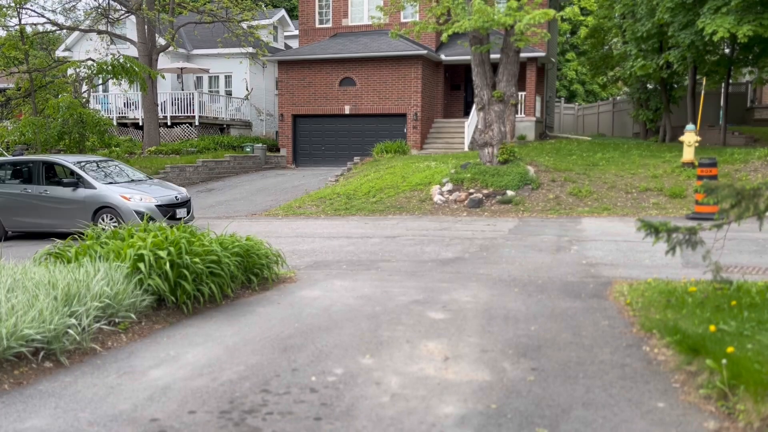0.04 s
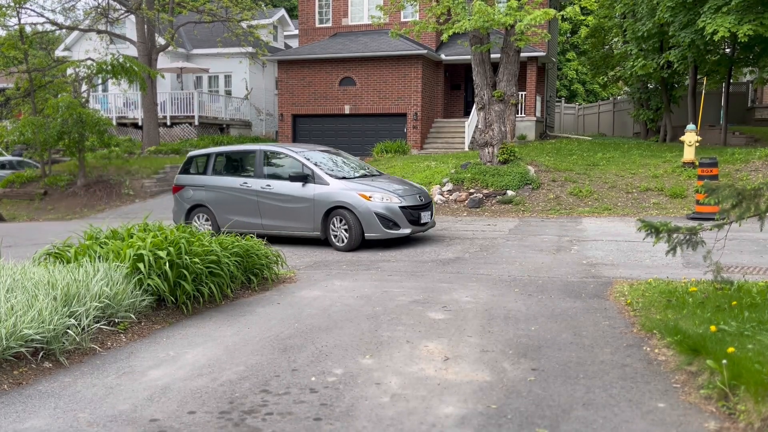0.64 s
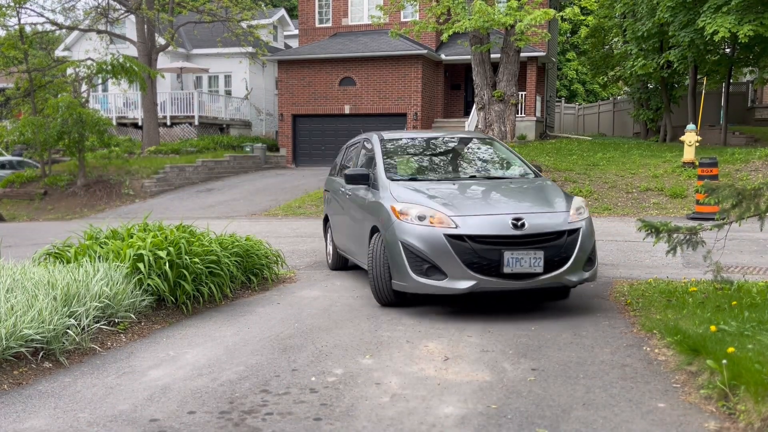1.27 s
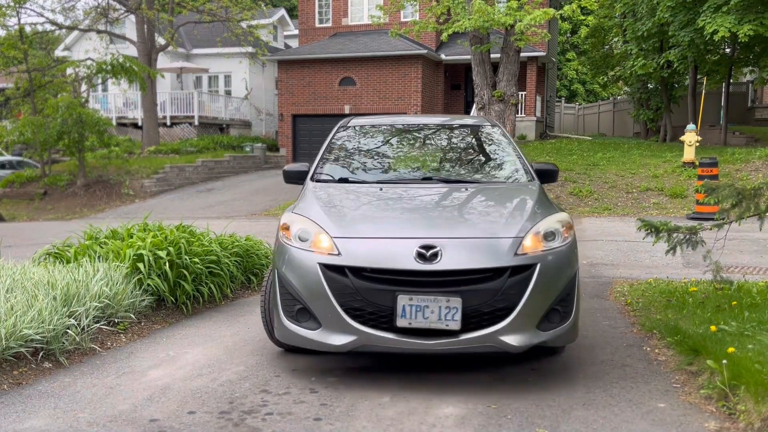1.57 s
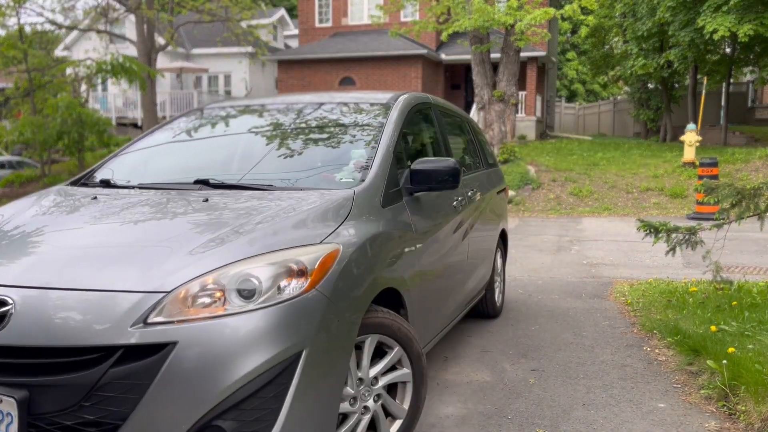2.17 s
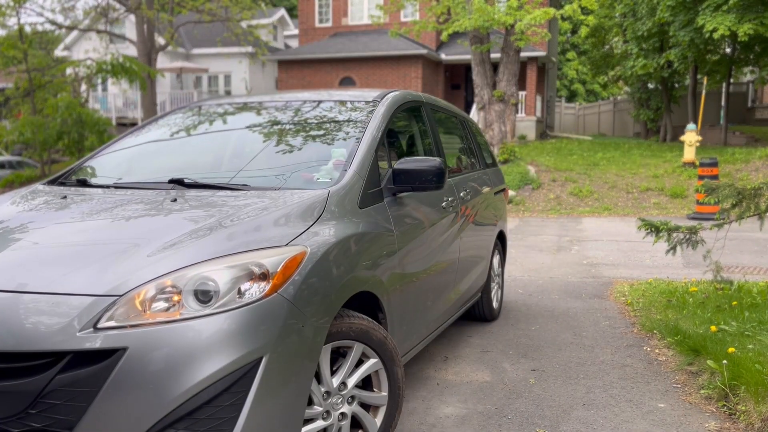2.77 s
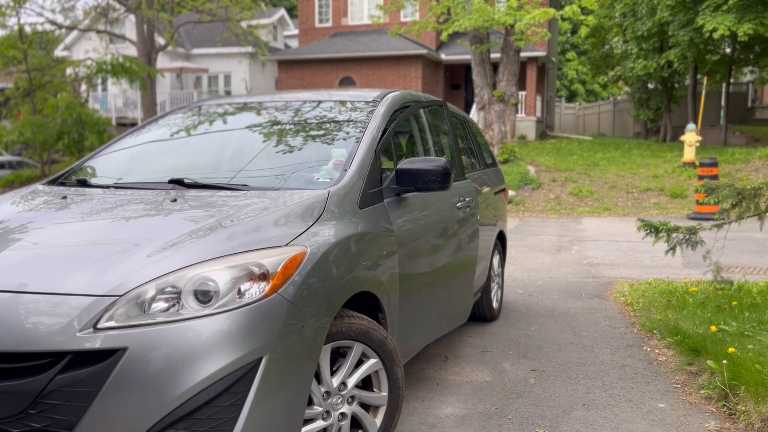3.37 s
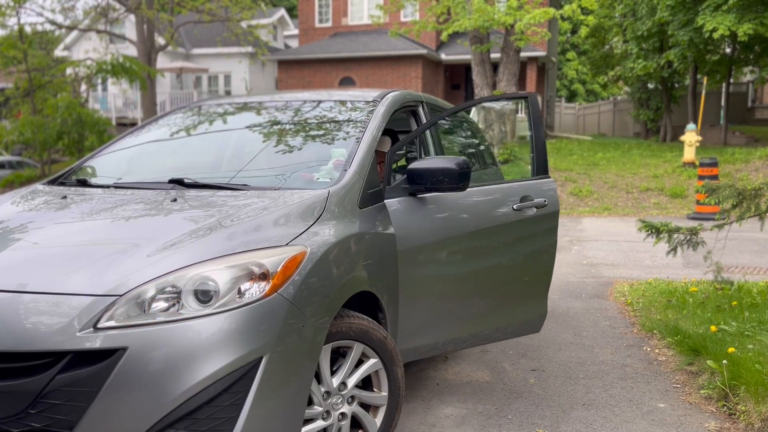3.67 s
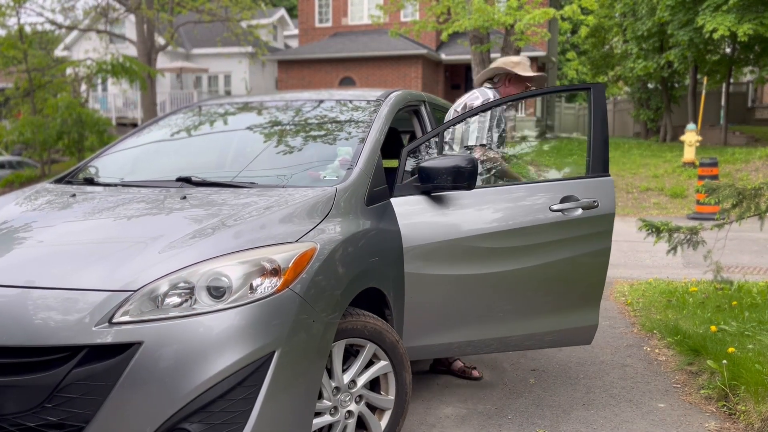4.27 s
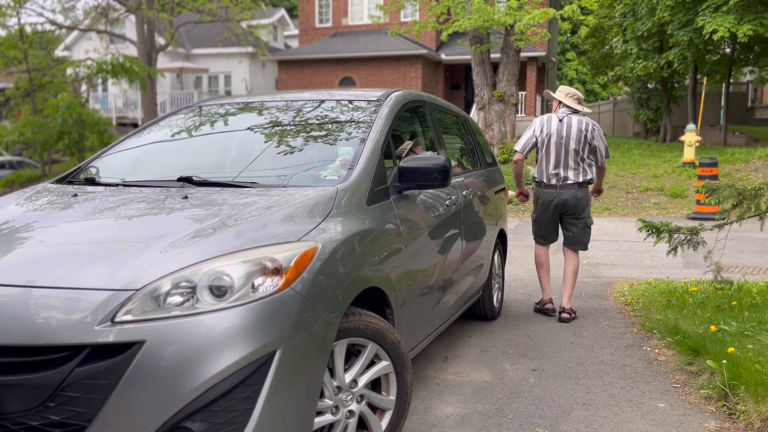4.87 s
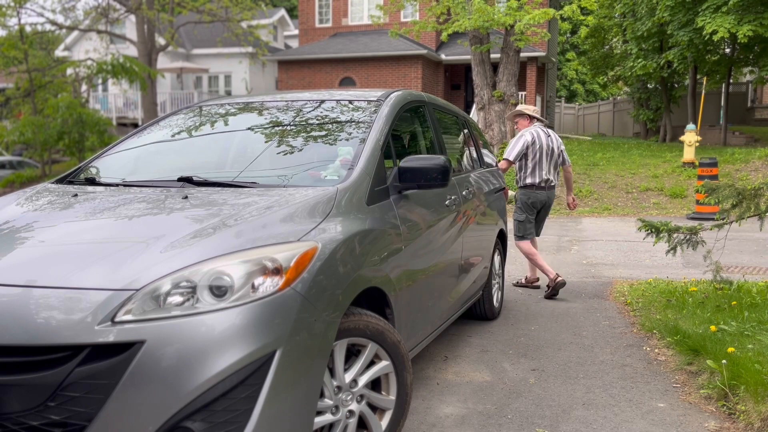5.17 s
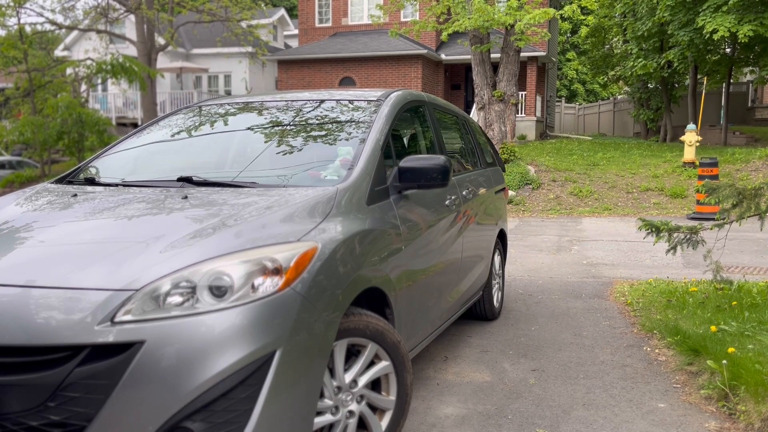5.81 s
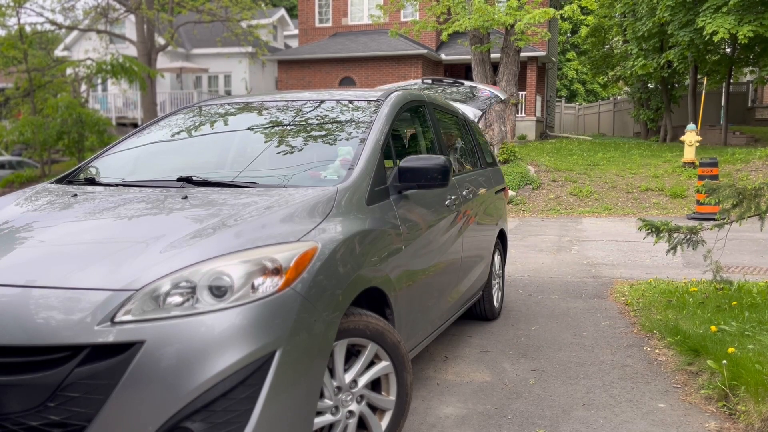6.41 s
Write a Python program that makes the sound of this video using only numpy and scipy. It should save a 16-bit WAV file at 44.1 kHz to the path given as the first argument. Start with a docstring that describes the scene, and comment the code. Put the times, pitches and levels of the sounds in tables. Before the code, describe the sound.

A small van's engine is running from the start, outdoors on a quiet street. It dips at about 0.4 seconds, revs briefly around 0.7, then settles to a low pulsing as it comes close, with a whirring fan and thin belt whine. Tyres scrub and crackle on the paving from about 0.5 to 2.5 seconds. At 2.9 the engine shuts off with a shudder and a few dull knocks. The door unlatches with two clacks around 3.3 seconds. The driver slides off the seat with a muffled rustle near 3.9, and keys clink between 4 and 4.4. At 4.8 the door slams close by, a loud thump with a short rattle and a slight echo off the houses. A small click follows, then the tailgate latch clunks softly at 5.7. Faint distant traffic and leaves continue underneath until the end, at about 6.5 seconds.

```python
"""A small van parks in a driveway

The van swings in over the paving, engine pulsing and fan whirring, stops close by and is switched off.
The driver opens the door, climbs out with clinking keys, slams it and unlatches the tailgate.
The houses echo it all, while distant traffic and leaves fill the quiet street."""
import sys
import numpy as np
from scipy import signal
from scipy.fft import rfft, irfft, next_fast_len
from scipy.io import wavfile
from scipy.ndimage import uniform_filter1d

SR = 44100
rng = np.random.default_rng(int(sys.argv[2]) if len(sys.argv) > 2 else 0)


def generate_wav(signal):
    """Clip the signal to [-1, 1] and save it as 16-bit WAV at the path in sys.argv[1]."""
    frames = np.transpose(np.atleast_2d(signal))
    scaled = np.clip(frames, -1, 1) * 32767
    pcm = np.round(scaled).astype(np.int16)
    wavfile.write(sys.argv[1], SR, pcm)


N = 293265
TIME = np.arange(N) / SR
KEY_OFF_S = 2.866


# How fast the engine fires until the key is turned: time_s, firings_per_s
ENGINE_SPEED = [(.03, 67.3), (.15, 63), (.2, 58.5), (.29, 45.5), (.37, 41), (.43, 46), (0.5, 67), (0.6, 94),
                (0.72, 106.5), (0.79, 101.5), (0.9, 81.7), (1.2, 69.5), (1.44, 72.1), (1.55, 75.9),
                (1.71, 66.2), (1.86, 70), (2.1, 65.2), (2.33, 69.8), (2.44, 67.7), (2.68, 60.5),
                (2.85, 70.2)]
def speed(run_down_s=0.11, walking_pace_hz=65):
    """The firing rate, dying away after key-off, and how many octaves it lies above walking pace."""
    rate = curves(ENGINE_SPEED)[0] * np.exp(-np.clip(TIME - KEY_OFF_S, 0, 1) / run_down_s)
    return rate, np.log2(rate / walking_pace_hz)


# Smooth when coasting, rough on the throttle: time_s, rough_share, blur_share, odd_harmonics_db
ENGINE_TEXTURE = [(.13, 0.15, 0.8, -10.5), (.35, 0.36, 1, -8), (.55, 0.28, 0.25, 0.5), (1.1, 0.27, 0.55, 1),
                  (1.55, 0.16, 0.39, 0)]
def firing(rate, lope=0.072, puff_turns=0.97, puff_hz=330, stumble_turns=0.052, harmonics=30):
    """Each firing is a pulse and a puff of gas. Blurring puts the harmonics out of step, into a hum."""
    rough, blur, odd_db = curves(ENGINE_TEXTURE)
    stumble = evened(band(rng.standard_normal(N), 28.7, "low"))
    turns = np.cumsum(rate) / SR + stumble_turns * rough * stumble  # one turn per firing
    odd = amp(odd_db)
    tone = sum((odd if k % 2 else 1) * np.cos(2 * np.pi * (k * turns + blur * lag))
               for k, lag in enumerate(rng.random(harmonics) - .5, 1))
    tone *= 1 + lope * (np.cos(np.pi * turns) + np.cos(np.pi * turns / 2))  # the cylinders are unequal
    puffs = np.exp(-(turns % 1) / puff_turns) * rng.standard_normal(N)
    puffs = signal.lfilter(*signal.butter(1, puff_hz, "high", fs=SR), band(puffs, 1600, "low"))
    running = TIME < KEY_OFF_S
    return (1 - rough) * tone / tone[running].std() + rough * puffs / puffs[running].std()


# The engine's three voices (coasting side-on, on the throttle, facing us): pitch_hz, level_db
COASTING = [(60, -34), (132, -1), (200, -13.5), (270, -4.5), (400, -10.5), (465, -7), (545, 1.5), (680, 3),
            (800, -1), (1400, -14), (2200, -58)]
PULLING = [(60, -34), (150, 3.5), (230, -1.5), (320, 6), (420, -9), (530, -0.5), (630, -3), (740, 0),
           (880, -18), (1300, -20), (2200, -43)]
NOSE_ON = [(60, -53.5), (135, -2.5), (205, 0.5), (272, 6.5), (340, -4.5), (420, -2), (560, -9), (680, -5.5),
           (770, -0.5), (1050, -25.5), (2200, -45)]
# Which voice we hear: time_s, voice (0 coasting, 1 pulling, 2 nose-on)
ENGINE_VOICE = [(.36, 0), (.5, 1), (.95, 1), (1.35, 2)]
# Exhaust and intake at walking pace, as the nose comes round: time_s, boom_db, growl_db
ENGINE_LEVELS = [(.1, -37.5, -43.5), (.31, -35.5, -41.5), (.4, -36.5, -46), (.52, -38, -42),
                 (.7, -39.5, -38.5), (1.2, -40.5, -55), (1.52, -34.5, -52.5), (2.3, -33.5, -42.5),
                 (2.8, -35.5, -47.5)]
# How strongly the air box rings in the turn: time_s, level_db
AIR_BOX_LEVEL = [(1.1, -25), (1.5, 5), (1.68, -5.5), (1.86, 6.5), (2.2, -22)]
# Its rising note: time_s, pitch_hz
AIR_BOX_PITCH = [(1.5, 478), (1.85, 525)]
def engine(rate, octaves, split_hz=450, db_per_octave=8, spreads_s=(.004, .003, .004)):
    """Four firing cylinders make the exhaust boom and the intake growl, louder with speed."""
    pulses = firing(rate)
    voice, = curves(ENGINE_VOICE)
    body = sum(np.maximum(1 - abs(voice - k), 0) * ring(dispersed(pulses, spreads_s[k]), colour)
               for k, colour in enumerate([COASTING, PULLING, NOSE_ON]))
    air_box = resonate(body, curves(AIR_BOX_PITCH)[0], width_hz=160)
    body = body + 2 * amp(curves(AIR_BOX_LEVEL)[0]) * air_box
    low = band(band(body, split_hz, "low")[::-1], split_hz, "low")[::-1]  # both ways, so no delay
    boom_db, growl_db = curves(ENGINE_LEVELS) + db_per_octave * octaves
    shudder = np.exp(-((TIME - 2.897) / 0.066) ** 2)  # the stalling engine shakes on its mounts
    boom = amp(boom_db + 8 * shudder) * steadied(low)
    growl = amp(growl_db + 7.5 * shudder) * steadied(body - low)
    return (boom + growl) * np.interp(TIME, [2.94, 3.02], [1, 0])


def dispersed(x, spread_s, top_hz=700):
    """A long path around the van smears each pulse: the treble arrives ahead of the bass."""
    length = next_fast_len(N + SR)
    hz = np.fft.rfftfreq(length, 1 / SR)
    lead_s = spread_s * np.minimum(hz / top_hz, 1)
    return irfft(rfft(x, length) * np.exp(2j * np.pi * np.cumsum(lead_s) * hz[1]), length)[:N]


# Belts and fan at walking pace, as the grille swings past: time_s, whirr_db, hiss_db
FAN_LEVELS = [(.4, -49.5, -62.5), (1.2, -52, -55.5), (1.9, -45.5, -49), (2.3, -44.5, -56),
              (2.85, -42, -57.5)]
# The tone of rushing air: pitch_hz, level_db
AIR_COLOUR = [(530, -1), (900, 1), (1210, -4.5), (1510, -3), (2050, -7), (5180, -17.5), (13400, -24),
              (15800, -29.5)]
# The fan's hiss ends up on the left: time_s, left_minus_right_db
HISS_PAN = [(.05, 7), (.6, 2), (1.4, 2), (2.74, 10.5)]
def whirr(rate, octaves, throb=0.089, split_hz=6500, db_per_octave=8):
    """Belts and fan rush louder with speed and throb with each firing."""
    whirr_db, hiss_db = curves(FAN_LEVELS) + db_per_octave * octaves
    rush = patchy(noise(AIR_COLOUR), depth_db=1.75, span_s=0.071, span_hz=200)
    rush = patchy(rush, depth_db=2.2, span_s=0.63, span_hz=129.2)  # the engine bay's ringing drifts
    rush *= 1 + throb * np.cos(2 * np.pi * np.cumsum(rate) / SR)
    low = amp(whirr_db) * evened(band(rush, split_hz, "low"))
    hiss = amp(hiss_db) * evened(band(rush, split_hz, "high"))
    return low + panned(hiss, curves(HISS_PAN)[0])


# Singing belts and pulleys: start_s, end_s, pitch_hz, width_hz, level_db
BELT_WHINES = [(.4, .98, 4980, 650, -55), (.6, 1.45, 4230, 260, -58.5), (2, 3.05, 5270, 280, -57.5)]
def whines():
    """Belts and pulleys sing airy notes that swell and fade."""
    air, out = noise(AIR_COLOUR), np.zeros((2, N))
    for start, end, hz, width_hz, db in BELT_WHINES:
        progress = np.clip((TIME - start) / (end - start), 0, 1)
        swell = np.sqrt(abs(np.sin(np.pi * progress)))
        out += amp(db) * swell * evened(resonate(air, hz, width_hz))
    return out


# How loud the tyres are: time_s, level_db
TYRE_LEVEL = [(.5, -54.5), (.93, -45), (1.3, -41), (1.65, -45), (1.9, -43), (2.5, -55), (2.8, -106)]
# The tone of rubber on paving: pitch_hz, level_db
TYRE_COLOUR = [(600, 1), (1200, 4), (2300, -2.5), (3300, 1.5), (6000, -4.5), (10000, -16), (16000, -59)]
def tyres(grains_per_s=260, spread_db=7, crack_db=-6, pan_db=-1):
    """The tyres scrub the paving in uneven patches and crack grains of sand."""
    sizes = amp(spread_db * np.minimum(rng.exponential(1, N), 2))
    grains = sizes * (rng.random(N) < grains_per_s / SR)
    crack = burst(TYRE_COLOUR, 0, fade_s=0.0044, tilt_db=5)
    cracks = signal.oaconvolve(grains[None], crack, axes=1)[:, :N]
    scrub = noise(TYRE_COLOUR) + amp(crack_db) * evened(cracks)
    scrub = patchy(scrub, depth_db=1.64, span_s=.04, span_hz=450)
    rolling = TIME < TYRE_LEVEL[-1][0]
    return panned(amp(curves(TYRE_LEVEL)[0]) * scrub * rolling, pan_db)


# The notes the door and its frame ring at: pitch_hz, level_db, fade_s
DOOR_NOTES = [(167.4, 5, 0.081), (207, -2, 0.17), (253, -1.5, 0.18), (336, -4.5, 0.12), (456, -7.5, 0.077),
              (522, -11, 0.12), (594, -13, 0.11), (680, -3, 0.065), (792, -15, 0.093), (1164, -8, 0.082),
              (1235, -12, .08), (1397, -12, .1), (1510, -12, 0.09), (1870, -12, 0.086), (1940, -4, 0.072),
              (2240, -7, .08)]
# The door meets the latch, then its seal: start_s, level_db, contact_s
DOOR_BLOWS = [(4.7807, -27, 0.00011), (4.7847, -13.5, 0.0046), (4.7918, -14, 0.00088)]
# Its sheet metal slaps as it stops: start_s, level_db, pitch_hz
DOOR_SLAPS = [(4.781, -13, 570), (4.791, -11.5, 437)]
# Latch and trim rattle: start_s, level_db, fade_s
DOOR_RATTLES = [(4.773, -30.5, 0.17), (4.7794, -13, 0.022), (4.781, -17, 0.046), (4.791, -23.5, 0.071),
                (4.812, -31, 0.037)]
# The tone of that rattle: pitch_hz, level_db
RATTLE_COLOUR = [(150, -6), (500, 10.5), (950, -6.5), (1400, 3), (2400, -6.5), (4000, -5.5), (5500, -10.5),
                 (9000, -11), (16000, -22)]
def slam(cycles_to_peak=.8):
    """The latch cracks, the door hits its seal and the panels boom while the trim rattles."""
    out, t = np.zeros((2, N)), TIME[:16000]
    panel = sum(amp(db) * np.sin(2 * np.pi * hz * t) * dying(t, fade_s) for hz, db, fade_s in DOOR_NOTES)
    for s, db, contact_s in DOOR_BLOWS:
        push = t * np.exp(-2 * np.pi * t / contact_s)  # a longer contact rings only the low notes
        add(out, s, amp(db) * signal.fftconvolve(panel, push / push.sum())[:len(t)])
    for s, db, hz in DOOR_SLAPS:
        age = t * hz / cycles_to_peak
        add(out, s, amp(db) * age * np.exp(1 - age) * np.sin(2 * np.pi * hz * t))
    for s, db, fade_s in DOOR_RATTLES:
        add(out, s, burst(RATTLE_COLOUR, db, fade_s))
    return out


# Dull knocks through the van's body: start_s, level_db, pitch_hz
BODY_KNOCKS = [(2.867, -9, 258.2), (2.886, -16.5, 209), (2.971, -18, 256), (3.0327, -8.5, 336),
               (3.051, -24, 171), (3.13, -28.5, 224), (3.758, -24.5, 216), (4.871, -21, 290)]
def knocks():
    """The van rocks to rest, levers are set and the door settles."""
    out = np.zeros((2, N))
    for s, db, hz in BODY_KNOCKS:
        add(out, s, thud(db, hz))
    return out


BODY_HZ, BODY_FADE_S = 194, 0.041
# The tone of the seat and trim: pitch_hz, level_db
TRIM_COLOUR = [(70, -39), (160, 14), (500, -8), (1000, -24), (4000, -43)]
def thud(db, hz, rise_s=0.0007, overtone_db=-11, rustle_db=-16):
    """One muffled thud in the van's body, with a rustle of trim."""
    t = TIME[:8000]
    fade_s = BODY_FADE_S * (BODY_HZ / hz) ** 2.65  # harder knocks ring higher and shorter
    overtone = amp(overtone_db) * np.sin(2 * np.pi * hz * 2.02 * t) * dying(t, 2 * fade_s)
    tone = (np.sin(2 * np.pi * hz * t) + overtone) * dying(t, fade_s)
    jolt = (burst(TRIM_COLOUR, rustle_db, fade_s) - tone) * (1 - np.exp(-t / rise_s))
    return amp(db) * band(band(jolt, 105, "high"), 700, "low")


# Lock, door and tailgate latches: start_s, click_db, thud_db, handle_lead_s
LATCHES = [(3.28, -44, -20.5, 0.002), (3.414, -34, -32, 0.0092), (5.66, -40.5, -24.5, 0.025)]
# The tones of latch and handle: pitch_hz, level_db
LATCH_COLOUR = [(200, -13), (700, 4), (1300, 3), (1750, 3), (2200, -0.5), (3000, -2), (4200, -7),
                (7200, -15.5), (15000, -26)]
HANDLE_COLOUR = [(1000, -16), (7300, -15), (8200, 6), (9200, -8), (15000, -18)]
def latches():
    """The handle ticks, then the latch springs with a clack and jolts the body."""
    out = np.zeros((2, N))
    for s, click_db, thud_db, lead_s in LATCHES:
        add(out, s - lead_s, burst(HANDLE_COLOUR, click_db - 14.5, fade_s=.02))
        add(out, s, burst(LATCH_COLOUR, click_db, fade_s=0.055) + thud(thud_db, BODY_HZ))
    return out


# The driver leans on the door, then slides off his seat: peak_s, level_db
SHUFFLES = [(3.355, -43), (3.878, -32.5)]
def shuffle(rise_s=0.035, fall_s=0.065, rub_s=3.905, rub_db=-47):
    """Seat and trim rumble as the driver shifts his weight, and cloth rubs over the seat's edge."""
    swell = sum(amp(db) * np.exp(np.minimum((TIME - s) / rise_s, (s - TIME) / fall_s))
                for s, db in SHUFFLES)
    cloth = evened(resonate(noise(AIR_COLOUR), hz=483, width_hz=230))
    rub = cloth * np.exp(-((TIME - rub_s) / rise_s) ** 2)
    return swell * noise(TRIM_COLOUR) + amp(rub_db) * rub


# Single small clicks: start_s, level_db, tilt_db_per_octave
CLICKS = [(.948, -35.5, -2), (1.833, -37, 11), (3.318, -48, 4.5), (3.707, -43.5, -0.5), (3.878, -43.5, -2),
          (3.943, -48, 0.5), (4.628, -39, -9), (5.218, -43.5, -1.5)]
# Their tone: pitch_hz, level_db
CLICK_COLOUR = [(150, -28), (450, 10.5), (900, 4), (2200, 2.5), (5000, 1.5), (10000, -11), (16000, -24)]
def clicks():
    """Small stones, levers and footsteps each give one short click."""
    out = np.zeros((2, N))
    for s, db, tilt_db in CLICKS:
        add(out, s, burst(CLICK_COLOUR, db, fade_s=0.05, tilt_db=tilt_db))
    return out


# Jolts to the bunch of keys: start_s, level_db, length_s, tilt_db_per_octave
KEY_JOLTS = [(3.955, -53, .005, -4), (3.999, -46.5, .005, 0), (4.133, -51, .005, -4),
             (4.3274, -38.5, .005, -6), (4.336, -36.5, .008, -4.5), (4.353, -43, .016, -3),
             (4.401, -39, .005, 0.5), (4.884, -41.5, .026, -2), (5.198, -54, .005, 3)]
# The bright tone of keys: pitch_hz, level_db
KEY_COLOUR = [(1200, -11), (3000, -2.5), (5000, 1.5), (6500, 0.5), (9000, 0), (12000, -1.5), (16000, -4)]
def keys(gap_s=0.0049, uneven=0.2, fall_db_per_s=200, fade_s=0.031):
    """Jolted keys swing back against each other, each clink weaker than the last."""
    out = np.zeros((2, N))
    for s, db, length_s, tilt_db in KEY_JOLTS:
        gaps = gap_s * (1 + uneven * rng.standard_normal(size=6))
        for delay in np.cumsum(gaps) - gaps[0]:
            clink = burst(KEY_COLOUR, db - fall_db_per_s * delay, fade_s, tilt_db)
            add(out, s + delay, (delay <= length_s) * clink)
    return out


# Thin squeaks and whistles: start_s, length_s, from_hz, to_hz, level_db
WHISTLES = [(1.746, 0.097, 3950, 4420, -50), (2.545, 0.13, 2088, 2150, -50),
            (4.147, 0.25, 13900, 11100, -66), (4.65, 0.06, 7950, 9800, -65),
            (5.83, 0.35, 14100, 10900, -67)]
def whistles(flutter=0.27, flutter_s=0.0048, waver=.055, waver_at_hz=12000):
    """Faint, high squeaks glide and flutter. The higher they are, the more their pitch wavers."""
    out = np.zeros(N)
    for start, length, from_hz, to_hz, db in WHISTLES:
        hz = np.linspace(from_hz, to_hz, round(length * SR))
        wobble, gusts = rng.standard_normal((2, len(hz)))
        hz *= 1 + waver * hz / waver_at_hz * evened(uniform_filter1d(wobble, size=20))
        strength = evened(1 + flutter * evened(uniform_filter1d(gusts, size=round(flutter_s * SR))))
        tone = np.sin(2 * np.pi * np.cumsum(hz) / SR)
        add(out, start, amp(db) * strength * tone * signal.windows.tukey(len(hz), .5))
    return out


def cabin(level_db=-63, whine_hz=12400):
    """A thin hiss with a faint whine escapes while the door stands open."""
    hiss = noise(KEY_COLOUR, tilt_db=-7.0)
    door_open = np.interp(TIME, [3.42, 3.6, 4.05, 4.78], [0, 1, 1, 0])
    return amp(level_db) * (hiss + resonate(hiss, whine_hz, width_hz=900)) * door_open


# Sound bouncing off the house fronts: delay_s, level_db
HOUSE_ECHOES = [(0.045, -30), (0.057, -27)]
def yard(x, dull_hz=900, tail_db=-30):
    """Adds dull echoes from the houses and a faint tail from the trees."""
    out, dull = x.copy(), band(x, dull_hz, "low")
    for delay, db in HOUSE_ECHOES:
        add(out, delay, amp(db) * dull)
    tail = burst([(100, 27), (1000, 45), (4000, -46)], 0, fade_s=0.28, size=24000)
    return out + amp(tail_db) * signal.oaconvolve(x, tail / np.linalg.norm(tail[0]), axes=1)[:, :N]


# The tone of traffic and leaves: pitch_hz, level_db
STREET_COLOUR = [(45, -25), (95, -21.5), (114, -8.5), (178, -1.5), (382, -12), (413, -17.5), (628, -19),
                 (955, -21.5), (1700, -24), (3190, -24), (9110, -47.5), (12200, -52.5), (15800, -57)]
# A far-off drone: time_s, level_db
DRONE_LEVEL = [(3.5, -62), (5.22, -60), (5.35, -55), (5.62, -54), (5.76, -57.5), (6.22, -57.5), (6.42, -57),
               (6.56, -51.5)]
def street(level_db=-44):
    """Distant traffic and leaves, and a hollow drone that swells near the end."""
    drone = evened(resonate(noise(AIR_COLOUR), hz=655, width_hz=270))
    return amp(level_db) * noise(STREET_COLOUR, width=1) + amp(curves(DRONE_LEVEL)[0]) * drone


# How alike left and right are at width 1: pitch_hz, likeness (0 to 1)
STEREO_LIKENESS = [(60, 0.99), (240, 0.99), (950, 0.76), (3770, 0.03), (15000, 0.58)]
def noise(colour, size=N, tilt_db=0, width=0.63):
    """Stereo noise with the given tone, alike on both sides in the bass; tilt_db brightens it."""
    length = next_fast_len(size)
    hz = np.fft.rfftfreq(length, 1 / SR)
    mid, side = rfft(rng.standard_normal((2, length)))
    same = read(STEREO_LIKENESS, hz)
    mid, side = mid * np.sqrt(1 + same), width * side * np.sqrt(1 - same)
    gain = amp(read(colour, hz) + tilt_db * np.log2(1 + hz / 1000))
    return evened(irfft(np.array([mid + side, mid - side]) * gain, length)[:, :size])


def burst(colour, db, fade_s, tilt_db=0, size=8000):
    """Fading noise, like many tiny notes struck at once."""
    return amp(db) * noise(colour, size=size, tilt_db=tilt_db) * dying(TIME[:size], fade_s)


def patchy(x, depth_db, span_s, span_hz):
    """Lets narrow ranges of pitch swell and fade on their own."""
    spectrum = signal.stft(x, nperseg=512)[2]
    swells = rng.standard_normal(spectrum.shape[1:])
    for axis, size in enumerate([span_hz * 512 / SR, span_s * SR / 256]):
        for _ in range(2):
            swells = uniform_filter1d(swells, max(round(size), 1), axis)
    spectrum *= amp(depth_db * evened(swells))
    return evened(signal.istft(spectrum, nperseg=512)[1][..., :x.shape[-1]])


def ring(x, colour, size=4096):
    """Passes x through a body that rings with the given tone."""
    log_gain = np.log(amp(read(colour, abs(np.fft.fftfreq(size, 1 / SR)))))
    response = np.fft.ifft(np.exp(np.conj(signal.hilbert(log_gain)))).real
    return signal.oaconvolve(x, response[:size // 2])[:N]


def resonate(x, hz, width_hz):
    """Keeps a narrow band around a pitch, which may glide."""
    turn = np.exp(2j * np.pi * np.cumsum(hz * np.ones(N)) / SR)
    r = np.exp(-np.pi * width_hz / SR)
    return 2 * (turn * signal.lfilter([(1 - r) ** 2], [1, -2 * r, r * r], x / turn + 1e-18)).real


def band(x, hz, kind):
    """Keeps what is below ("low") or above ("high") hz."""
    return signal.sosfilt(signal.butter(4, hz, kind, fs=SR, output="sos"), x)


def dying(t, fade_s):
    """Falls 60 dB in fade_s."""
    return np.exp(-np.log(1000) * t / fade_s)


def amp(db):
    """Decibels to gain."""
    return 10 ** (np.asarray(db) / 20)


def evened(x):
    """Scales to an average (rms) level of 1."""
    return x / np.sqrt(np.mean(x ** 2) + 1e-20)


def steadied(x):
    """Holds the level near 1 from moment to moment."""
    power = uniform_filter1d(uniform_filter1d(x ** 2, size=3000), size=3000)
    return x / np.sqrt(abs(power) + 1e-12)


def read(points, hz):
    """Looks up a table at the given pitches."""
    pitches, values = np.transpose(points)
    return np.interp(np.log(hz + 1), np.log(pitches + 1), values)


def curves(rows):
    """Turns a table into curves over time."""
    times, *columns = np.transpose(rows)
    return [np.interp(TIME, times, column) for column in columns]


def panned(x, db):
    """Places a sound; db is left minus right."""
    return x * amp(np.array([[.5], [-.5]]) * db)


def add(mix, start_s, sound):
    """Mixes a sound in at start_s."""
    part = mix[..., round(start_s * SR):][..., :sound.shape[-1]]
    part += sound[..., :part.shape[-1]]


def scene():
    """The van and its driver in the street."""
    rate, octaves = speed()
    van = engine(rate, octaves) + whirr(rate, octaves) + whines() + tyres() + knocks() + whistles()
    driver = latches() + shuffle() + clicks() + keys() + cabin() + slam()
    return yard(van + panned(driver, 0.3)) + street()


def record(dry, low_cut_hz=78, high_cut_hz=15900):
    """The microphone loses the deepest bass and the highest treble."""
    treble_cut = signal.firwin(511, high_cut_hz, window=("kaiser", 9), fs=SR)
    return signal.oaconvolve(band(dry, low_cut_hz, "high"), treble_cut[None], "same")


dry = scene()
out = record(dry)
generate_wav(out)
```